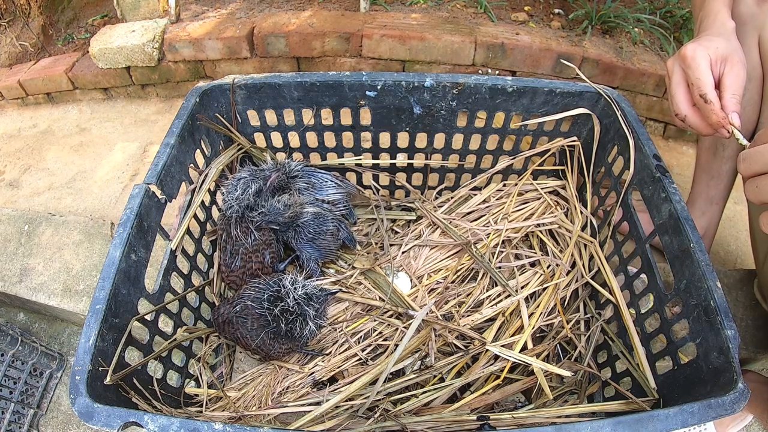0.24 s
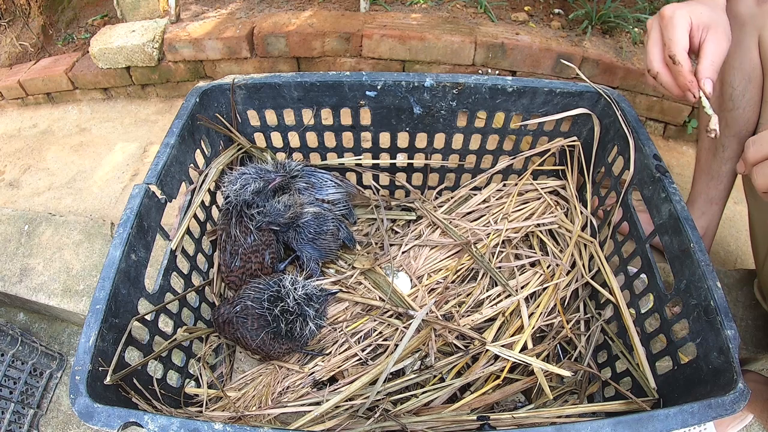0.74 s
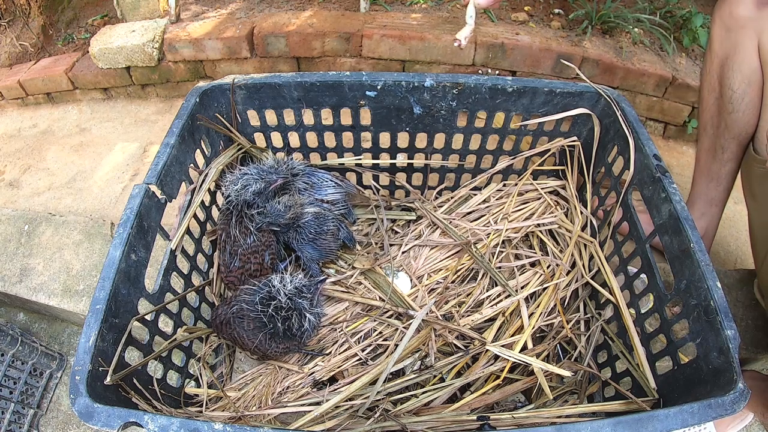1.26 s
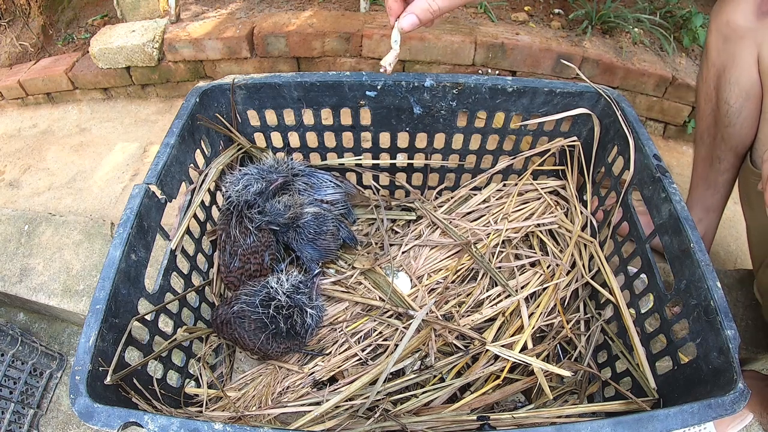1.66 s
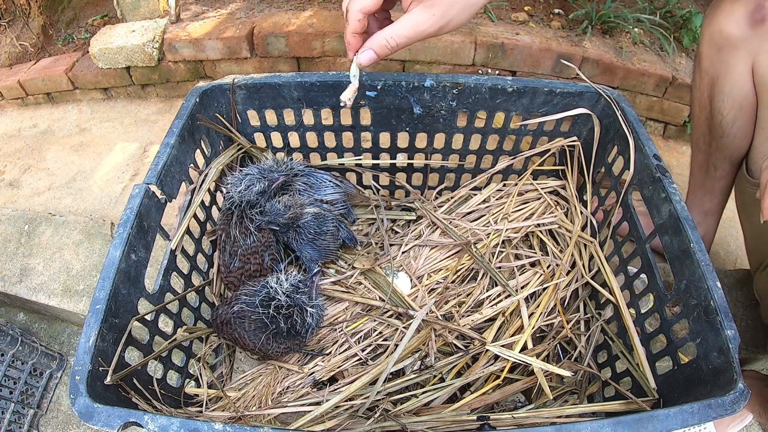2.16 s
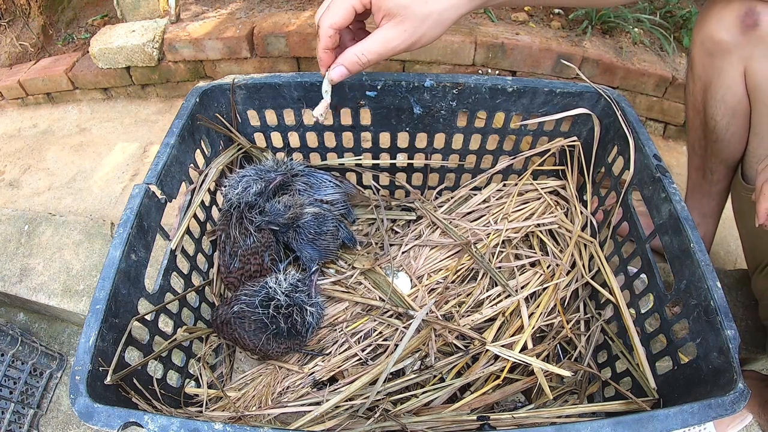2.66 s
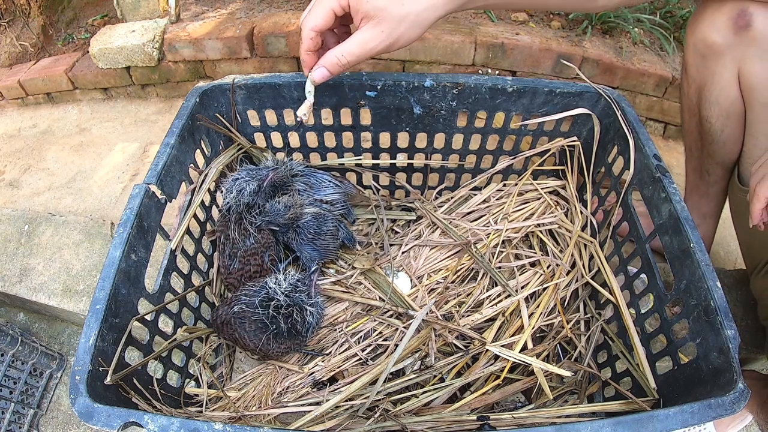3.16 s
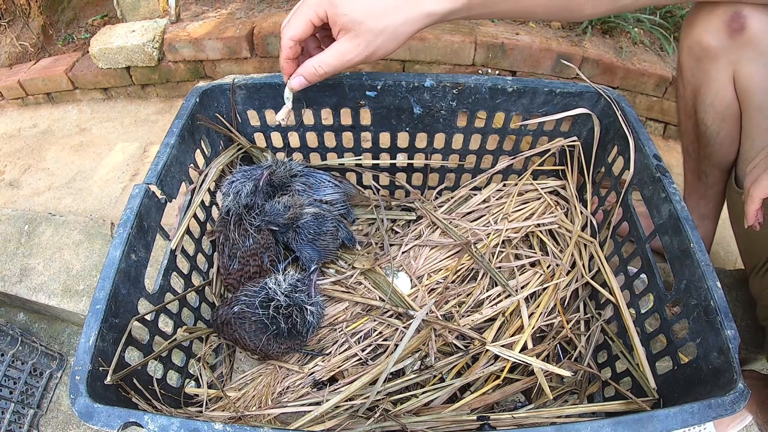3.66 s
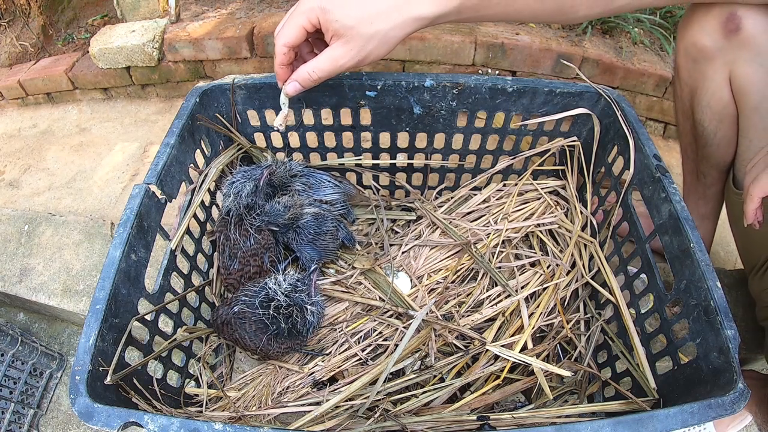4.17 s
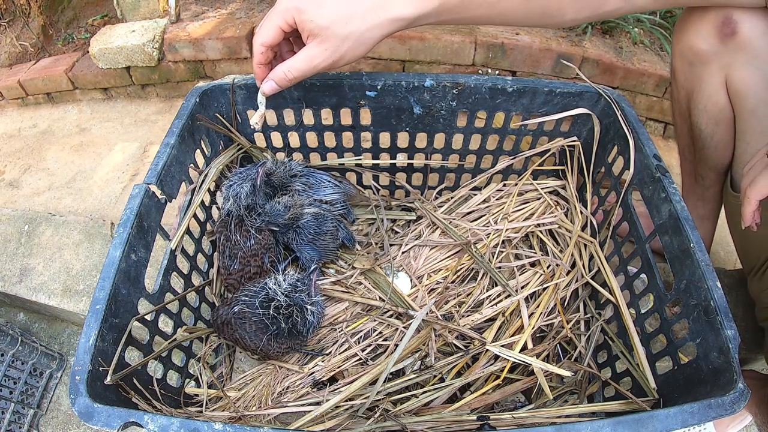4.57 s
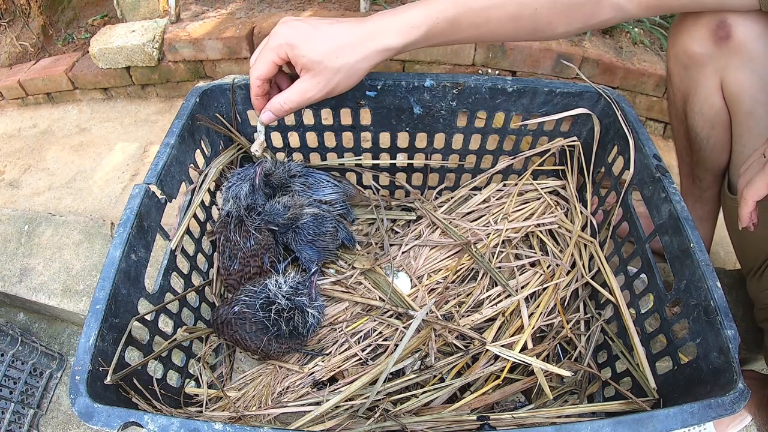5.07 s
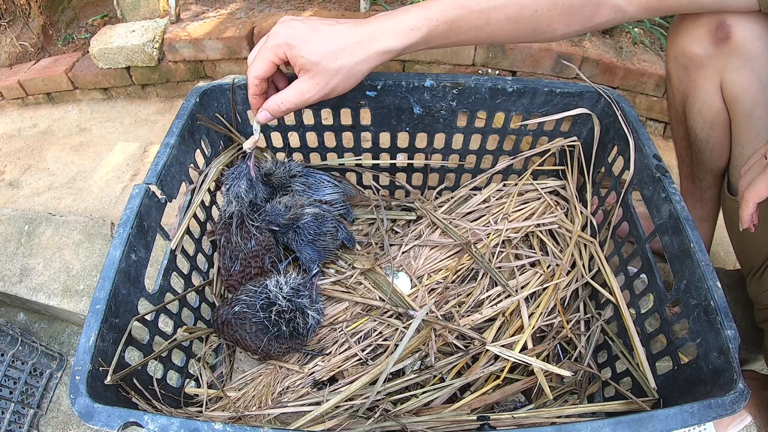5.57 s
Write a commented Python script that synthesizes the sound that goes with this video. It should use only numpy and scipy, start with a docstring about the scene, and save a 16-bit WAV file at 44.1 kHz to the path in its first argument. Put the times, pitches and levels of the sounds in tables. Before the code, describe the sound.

Steady insect chirr and small distant birds outdoors, then a close young bird hoots quickly in two runs with a short pause between them.

```python
"""A nestling in a plastic basket outdoors, close to the microphone, begs in two quick runs of falling hoots:
near sines that sag in pitch, with a tick and a thump ahead; a wall and the yard return them.
Small birds further off whistle with side tones and slur with a fast trill. Insects chirr steadily as shaped noise.
A few soft noise bursts rustle, over faint outdoor air and a low distant rumble with a wavering hum."""
import sys
import numpy as np
from scipy import signal
from scipy.fft import rfft, irfft
from scipy.io import wavfile
from scipy.ndimage import uniform_filter1d

SR = 44100
rng = np.random.default_rng(int(sys.argv[2]) if len(sys.argv) > 2 else 0)


def digitize_waveform(pressure):
    """Quantize a signal to 16-bit integers and store it at the path in sys.argv[1].

    Rows of a 2-D input are taken as channels; values are limited to [-1, 1].
    """
    field = np.atleast_2d(pressure).T
    bounded = np.clip(field, -1, 1)
    quanta = np.round(bounded * 32767).astype(np.int16)
    wavfile.write(sys.argv[1], SR, quanta)


N = 256662
T = np.arange(N) / SR  # s

# hoots: start_s, length_s, top_pitch_hz (before scoop and sag), level_db (mid-note), swell_db (over the note)
HOOTS = [(1.42, 0.074, 1113, -18, 11.5), (1.598, 0.08, 1135, -16.5, -5), (1.771, 0.1, 1181, -15.5, -1),
         (2.001, 0.04, 1088, -22.5, 6), (2.186, .068, 1097, -14.5, -1), (2.388, .056, 1175, -18.5, 22),
         (2.576, 0.07, 1102, -16.5, -4.5), (2.793, 0.064, 1106, -15, 6), (3.014, .052, 1102, -16, 4.5),
         (3.942, 0.05, 1103, -15, 2.5), (4.106, 0.073, 1159, -13, 1), (4.319, 0.067, 1066, -40, -6),
         (4.518, 0.086, 1146, -12, 3.5)]
VOICING_DB = -42  # level of a barely voiced hoot


def undb(db):
    """Decibels to gain."""
    return 10 ** (np.asarray(db) / 20)


def curve(table, column):
    """One column of a time table, interpolated for every sample."""
    table = np.asarray(table)
    return np.interp(T, table[:, 0], table[:, column])


def noise(shape):
    """Noise of rms 1 with a spectrum of (Hz, dB) points, falling 20 dB per octave beyond them."""
    hz, db = np.transpose(shape)
    f = np.arange(N // 2 + 1) * SR / N + 1
    octaves_beyond = np.maximum(np.log2(f / hz[-1]), 0) + np.maximum(np.log2(hz[0] / f), 0)
    spectrum_db = np.interp(np.log(f), np.log(hz), db) - 20 * octaves_beyond
    y = irfft(rfft(rng.standard_normal(N)) * undb(spectrum_db), N)
    return y / y.std()


def wide(shape, likeness):
    """Two channels of such noise, partly alike."""
    c = np.clip(likeness, 0, 1)
    shared = np.sqrt(c) * noise(shape)
    return shared + np.sqrt(1 - c) * np.array([noise(shape), noise(shape)])


def walk(rate):
    """Smooth random motion of spread 1, from random steps drawn at this rate in Hz."""
    k = max(int(SR / rate), 2)
    steps = np.repeat(rng.standard_normal(N // k + 1), k)
    y = uniform_filter1d(steps, k)[:N]
    return y / y.std()


def band(x, lo_hz, hi_hz):
    """Gentle band-pass."""
    top_hz = min(max(hi_hz, lo_hz + 20), SR / 2 - 1000)
    return signal.sosfilt(signal.butter(2, [lo_hz, top_hz], "band", fs=SR, output="sos"), x)


def late(x, seconds):
    """The sound, delayed as by a longer path."""
    return np.interp(T - seconds, T, x, left=0)


def note(start, length):
    """Sample indices of a note and its progress from 0 to 1."""
    i = np.arange(max(int(start * SR), 0), min(int((start + length) * SR), N))
    return i, np.clip((T[i] - start) / length, 0, 1)


def turn(hz):
    """Phase of a moving frequency."""
    return 2 * np.pi * np.cumsum(hz) / SR


def arch(u, steep):
    """A note's envelope: smooth edges around a rounded top, flatter when steep."""
    return np.tanh(steep * np.sin(np.pi * u) ** 2) / np.tanh(steep)


def yard(x, t60):
    """Diffuse scatter from ground, walls and leaves: a decaying noise tail, different on each side."""
    t = T[:SR // 2]
    decay = np.exp(-np.log(1000) * t / t60)
    tail = rng.standard_normal((2, len(t))) * decay * (1 - np.exp(-t / 0.0024))
    tail /= np.sqrt(np.sum(tail ** 2, axis=1, keepdims=True))
    return signal.fftconvolve(x[None], tail, axes=1)[:, :N]


def scuff(start, hz, db, decay):
    """A dull burst of noise that dies away exponentially."""
    out = np.zeros(N)
    i, u = note(start, 5 * decay)
    burst = band(rng.standard_normal(len(i)), hz * .65, hz * 1.35)
    out[i] = undb(db) * burst / burst.std() * np.exp(-5 * u) * (1 - np.exp(-30 * u))
    return out


def distance():
    """Faint outdoor air, a low rumble that swells and fades with a wavering hum, and an unsteady deep murmur."""
    # distant swell, before each layer's gain: time_s, level_db
    rumble_level = [(0.0, -60.5), (0.92, -54), (1.07, -60.5), (2.87, -62.5), (3.84, -57.5), (4.68, -62),
                    (5.82, -55)]
    # deep murmur, before its gain: time_s, level_db
    deep_level = [(0.15, -76.5), (0.61, -60), (0.64, -69.5), (5.68, -75), (5.7, -71)]
    # noise spectra of air, rumble and murmur: frequency_hz, relative_db (per Hz)
    air_shape = [(200, -0.5), (320, 2), (500, -1.5), (1000, -1), (1900, -9.5)]
    rumble_shape = [(105, -21), (128, -9.5), (146, -1.5), (160, 0.5), (180, 1), (212, -3.5), (280, -12.5),
                    (450, -30)]
    deep_shape = [(25, -11), (42, -10), (58, -0.5), (85, -3), (110, -4), (150, -16)]
    swell_db = curve(rumble_level, 1)
    breeze = wide(air_shape, likeness=.6) * undb(.6 * walk(5))
    deep = wide(deep_shape, likeness=.93) * undb(curve(deep_level, 1) + 2.0 + 2.0 * walk(9.3))
    hum = np.sin(turn(146 + 5 * walk(21))) * undb(swell_db - 4.0 + 3.6 * walk(13))
    rumble = wide(rumble_shape, likeness=.7) * undb(.8 * walk(9))
    return undb(-63.0) * breeze + deep + hum + rumble * undb(swell_db - 0.5)


def insects():
    """Blended stridulations as noise: a broad chorus, a high shrill, and a throbbing singer to the left in bouts."""
    # noise spectra of the three: frequency_hz, relative_db (per Hz)
    chorus_shape = [(1500, -13.5), (2100, -8.5), (2500, -0.5), (3100, -0.5), (3800, 1.5), (4400, -2),
                    (5800, -1.5), (7000, -23.5), (9000, -39)]
    shrill_shape = [(4500, -21), (6200, -1), (7300, 4.5), (7900, -1), (8500, 2), (9200, -4), (10000, -5),
                    (10800, -14), (11700, -30.5), (13800, -23), (15000, -28.5)]
    singer_shape = [(4400, -24.5), (4720, -12), (4880, 3.5), (5000, -5), (5150, -15), (5270, -1),
                    (5380, 6.5), (5550, -15.5), (5800, -7), (6200, -22)]
    # levels of chorus and shrill, before their gains: time_s, level_db
    chorus_level = [(0.0, -59), (0.99, -57.5), (2.32, -62), (4.49, -62), (5.82, -59)]
    shrill_level = [(0.0, -59.5), (0.52, -59), (1.28, -59), (1.41, -65), (3.57, -64), (3.82, -60.5),
                    (4.8, -67.5), (5.74, -62.5), (5.82, -63.5)]
    # bouts of the single singer, before placing left: start_s, length_s, level_db (at the top)
    singer_bouts = [(1.053, .8, -57.5), (3.55, 0.52, -58), (4.357, 1.18, -57.5)]
    chorus_gain_db, shrill_gain_db = 9.5, 9.5
    singer_rest_db = -63  # between bouts, before placing left
    shrill_lag = 2  # samples between the ports

    chorus_db = curve(chorus_level, 1) + chorus_gain_db + .4 * walk(25)
    chorus = wide(chorus_shape, likeness=0.34) * undb(chorus_db)
    shrill_db = curve(shrill_level, 1) + shrill_gain_db + 0.58 * walk(50)
    left, right = wide(shrill_shape, likeness=0.18) * undb(shrill_db)
    shrill = np.array([np.roll(left, shrill_lag), right])  # it reaches the left port later
    song = np.full(N, undb(singer_rest_db))
    for start, length, db in singer_bouts:
        i, u = note(start, length)
        song[i] = np.maximum(song[i], undb(db) * arch(u, steep=0.99))
    singer = wide(singer_shape, likeness=0.086) * song * undb(2 * walk(45))
    return chorus + shrill * undb([[-.5], [.5]]) + singer * undb([[1.5], [-4]])


def rustles():
    """Short dull scuffs of straw and plastic as the nestlings shift: band-passed noise bursts."""
    # scuffs: start_s, centre_hz, level_db (before the burst's fade)
    scuffs = [(.739, 1310, -52.5), (.94, 820, -51), (1.099, 1230, -45.5), (3.873, 1090, -49.5)]
    return sum(scuff(start, hz, db, decay=0.016) for start, hz, db in scuffs)


def whistles(notes, glide_hz_per_s, side_db):
    """A high tone hooked at each end; a second, slower vibration puts a side tone above and below it."""
    side_tone_hz = 752  # distance from the main tone, before the flutter
    out, waver, flutter = np.zeros(N), walk(220), walk(130)
    for start, length, hz, db in notes:
        i, u = note(start, length)
        hook = 750 * np.exp(-u / 0.08) - 800 * np.exp((u - 1) / 0.066)
        glide = hz + glide_hz_per_s * length * (u - .5) + hook
        glide = glide + (20 + 0.13 * abs(hook)) * waver[i]
        tone, beat = turn(glide), turn(side_tone_hz + 15 * flutter[i])
        side_tones = np.sin(tone + beat) + 0.98 * np.sin(tone - beat)
        side_tones = side_tones + 0.25 * np.sin((tone + beat) / 2)
        envelope = undb(db + 0.54 * flutter[i]) * arch(u, steep=4.5)
        out[i] += envelope * (np.sin(tone) + undb(side_db) * side_tones)
    return out


def slurs(notes, trill_hz, depth_hz, rough_hz):
    """A gliding tone shaken by a fast uneven trill that narrows to a thin line as the pitch falls."""
    out, uneven, rough = np.zeros(N), walk(90), walk(900)
    for start, length, from_hz, to_hz, db in notes:
        i, u = note(start - .005, length + .012)
        hz = from_hz * (to_hz / from_hz) ** u
        trill = turn(trill_hz * (1 + .16 * uneven[i]))
        effort = np.minimum(hz / from_hz, 1) ** 4.6
        shake = effort * (depth_hz * np.sin(trill) + rough_hz * rough[i])
        envelope = undb(db - 2.4 * (u - 1.5)) * arch(u, steep=10.0) * (1 - 0.088 * np.cos(trill))
        out[i] += envelope * np.sin(turn(hz + shake))
    return out


def small_birds():
    """Thin voices from the bushes: whistles, peeps, buzzy slurs and far chirps, with much scatter."""
    # falling whistles: start_s, length_s, middle_pitch_hz, level_db (main tone, right port)
    whistle_notes = [(.902, 0.097, 6860, -43), (1.078, .099, 6870, -41.5), (3.802, .1, 6920, -40.5),
                     (3.98, 0.11, 6910, -42.5), (4.183, 0.11, 6890, -44), (5.755, 0.14, 7280, -49.5)]
    # short rising peeps: start_s, middle_pitch_hz, level_db (main tone, right port)
    peep_notes = [(.598, 6430, -45.5), (0.728, 7070, -42.5), (2.5, 6860, -46.5), (3.662, 6880, -44)]
    # buzzy slurs, all falling from one pitch: start_s, length_s, end_hz, level_db (before tilt and gain)
    slur_notes = [(0, 0.074, 6000, -48), (0.122, .09, 5600, -47.5), (.31, 0.1, 5520, -50.5),
                  (0.796, 0.13, 5950, -44.5), (1.015, 0.11, 6100, -46.5), (1.139, .11, 6220, -46),
                  (1.307, .09, 6000, -50.5), (1.651, 0.13, 5900, -53.5), (1.787, 0.097, 5900, -50.5),
                  (1.923, 0.083, 5930, -50.5), (2.009, 0.16, 4300, -46.5), (2.243, 0.098, 5430, -49),
                  (2.393, .085, 5370, -49), (2.58, 0.15, 4260, -47.5), (3.21, 0.15, 4400, -50.5),
                  (3.366, .165, 4480, -50), (3.48, 0.064, 6520, -52), (3.61, 0.12, 5860, -50.5),
                  (3.79, 0.06, 6000, -45.5), (3.972, 0.14, 4550, -50.5), (4.21, 0.14, 4230, -46.5),
                  (5.36, .08, 5500, -56), (5.554, 0.15, 4100, -49)]
    # lower chirps of a far bird: start_s, length_s, start_hz, end_hz, level_db (before tilt and gain)
    far_notes = [(.925, 0.017, 2920, 3020, -45.5), (4.595, 0.018, 2610, 2660, -52),
                 (4.718, 0.055, 2500, 2760, -49), (4.752, 0.041, 3140, 2820, -47.5),
                 (4.79, 0.0686, 2870, 2850, -52.5)]
    peep_s, slur_top_hz = .048, 6870

    clear = whistles(whistle_notes, glide_hz_per_s=-3230, side_db=-2.5)
    peeps = [(start, peep_s, hz, db) for start, hz, db in peep_notes]
    clear = clear + whistles(peeps, glide_hz_per_s=19000, side_db=-11.5)
    falling = [(start, length, slur_top_hz, end_hz, db) for start, length, end_hz, db in slur_notes]
    buzzy = slurs(falling, trill_hz=105.0, depth_hz=498, rough_hz=423)
    far = slurs(far_notes, trill_hz=69.1, depth_hz=113, rough_hz=167)
    direct = np.array([0.82 * clear, clear])
    direct = direct + undb(-1.5) * np.array([late(buzzy, 1 / SR), buzzy]) + undb(-2.5) * far
    near_scatter = yard(undb(-6) * clear + undb(-4.5) * buzzy, t60=.19)
    return direct + near_scatter + undb(-6) * yard(far, t60=0.31)


def bill():
    """Before every full hoot the bill opens with a tick, then the throat tenses with a soft thump."""
    tick_db, tick_hz, tick_early_s, tick_decay_s = -48.5, 980, 0.039, 0.007
    thump_db, thump_hz, thump_early_s, thump_decay_s = -56, 370, .02, .011  # level at the start of a run
    thump_growth_db_per_s = 8  # it strains harder as a run goes on
    pause_s = .5  # a longer gap between hoots starts a new run
    out, run_start, previous = np.zeros(N), 0, 0
    for start, _, _, db, _ in HOOTS:
        if start - previous > pause_s:
            run_start = start
        previous = start
        if db > VOICING_DB + 10:
            strain_db = thump_growth_db_per_s * (start - run_start)
            out += scuff(start - tick_early_s, tick_hz, tick_db, tick_decay_s)
            out += scuff(start - thump_early_s, thump_hz, thump_db + strain_db, thump_decay_s)
    return out


def nestling():
    """Each hoot is a near sine that rises, holds, then sags as the pressure runs out; a shaky tone leads it in."""
    # the nestling slowly turns towards the middle: time_s, left_minus_right_db
    facing = [(1.4, -9.8), (3.0, -7.5), (4.6, -6.5)]
    sag_share, sag_per_push, sag_power = 0.1, 0.65, 3.64  # share of pitch lost, plus more per unit amplitude
    scoop_hz, scoop_share = 49.7, 0.21  # start under the pitch; recovery constant as a share of the note
    rasp_db, rasp_per_db = -47.5, 0.1215  # air noise hardly follows the hoot's level
    falter_db = 6.5  # greatest wavering of a hoot at the voicing level; less in stronger ones
    lead_db_usual, lead_under_db, lead_early_s = -38.5, -13.5, .04  # level, limit against the hoot, head start
    usual_length_s, lead_db_per_s = .07, 217  # slow to catch: a shorter hoot, a stronger lead-in
    lean_below_hz, lean_db_per_hz = 1063, 0.0482  # the low end of a hoot leans further right

    out, tremble, falter = np.zeros((2, N)), walk(300), walk(160)
    rasp = noise([(300, -18.5), (700, -26), (950, -10.0), (1060, 3), (1200, -1), (1500, -14), (2200, -22)])
    sides = undb(np.array([[.5], [-.5]]) * curve(facing, 1))
    for start, length, top_hz, db, swell_db in HOOTS:
        i, u = note(start - .006, length + .012)
        sag = sag_share + sag_per_push * undb(db)  # harder hoots sag further
        hz = top_hz * (1 - sag * u ** sag_power) - scoop_hz * np.exp(-u / scoop_share)
        # the left port leads in phase
        phase = turn(hz * (1 + 0.0017 * tremble[i])) + np.array([[.65], [0]])
        held = arch(u, steep=length / 0.043) ** 1.22  # longer notes hold a flatter top
        wavering_db = falter_db * undb(VOICING_DB - db) * np.tanh(falter[i])
        push = held * undb(swell_db * (u - .5) + wavering_db)
        # the octave slides through a narrow throat resonance
        throat = 1 / (1 + ((2 * hz - 2120) / 95) ** 2)
        overtone = undb(-32.5) * push ** 2 * throat
        lean = undb(np.array([[-1], [0]]) * lean_db_per_hz * np.maximum(lean_below_hz - hz, 0))
        out[:, i] += undb(db) * lean * (push * np.sin(phase) + overtone * np.sin(2 * phase))

        i, u = note(start - .025, length + 0.036)
        out[:, i] += undb(rasp_db + rasp_per_db * (db - VOICING_DB)) * rasp[i] * arch(u, steep=0.58)

        i, u = note(start - lead_early_s, .063)
        lead = np.sin(turn(.975 * top_hz * (1 + 0.053 * tremble[i]))) * (1 + .5 * falter[i])
        lead_db = min(lead_db_usual + lead_db_per_s * (usual_length_s - length), db + lead_under_db)
        out[:, i] += undb(lead_db) * arch(u, steep=1.2) * u * lead
    out = out * sides
    voice = out.mean(axis=0)
    # the wall's echo favours the middle of the pitch range
    wall = undb(-30.5) * band(late(voice, .078), 1045, 1108)
    return out + wall + undb(-23) * yard(voice, t60=.27)


def scene():
    """All sources together at the microphone."""
    return nestling() + bill() + small_birds() + insects() + rustles() + distance()


def record(dry):
    """The recorder cuts the top above 15 kHz with a steep low-pass."""
    return signal.sosfilt(signal.ellip(8, .2, 70, 15000, fs=SR, output="sos"), dry)


dry = scene()
out = record(dry)
digitize_waveform(out)
```